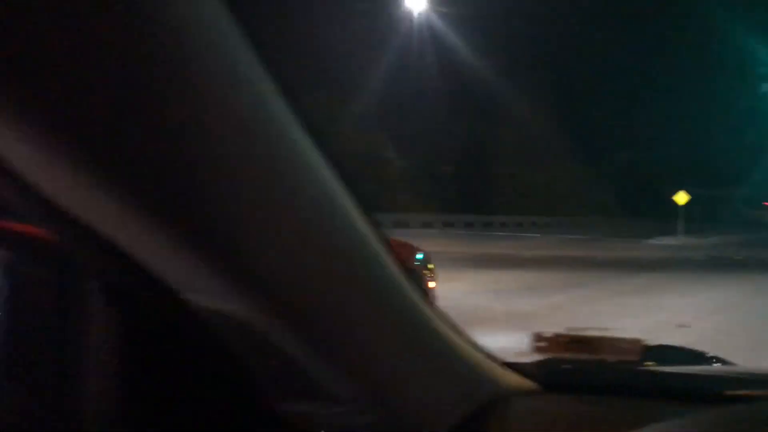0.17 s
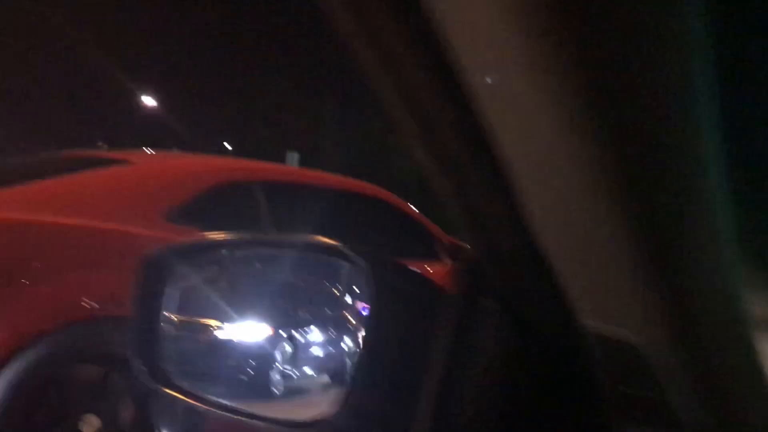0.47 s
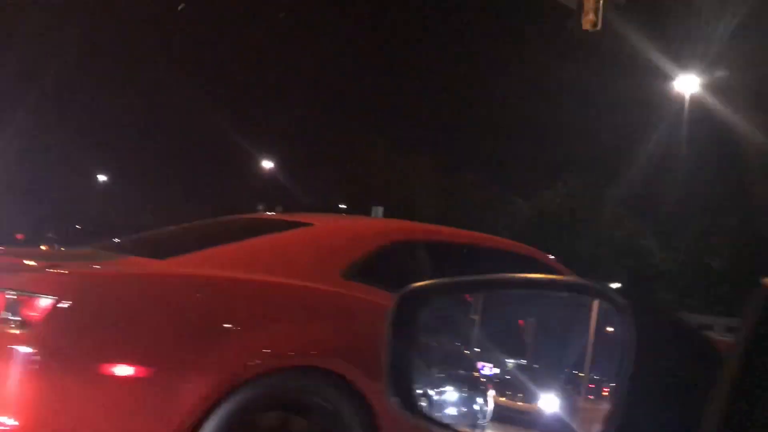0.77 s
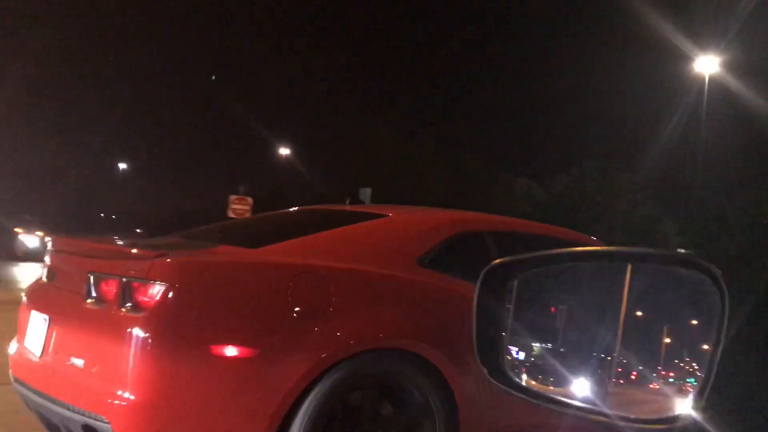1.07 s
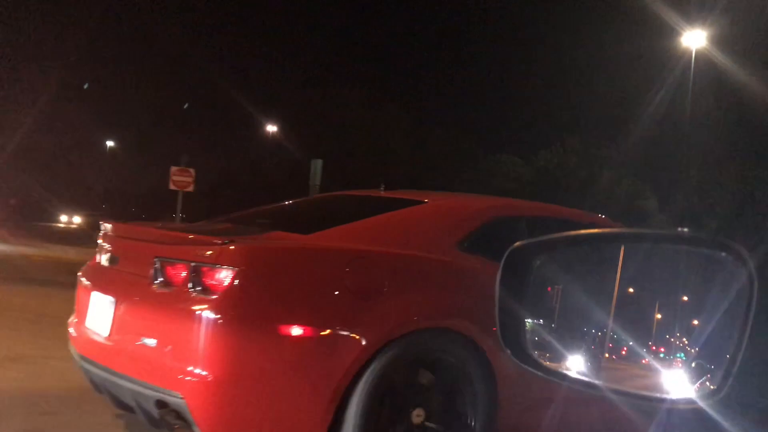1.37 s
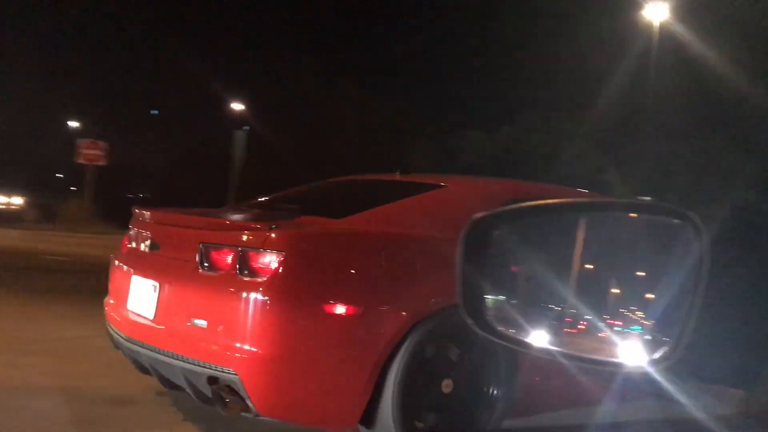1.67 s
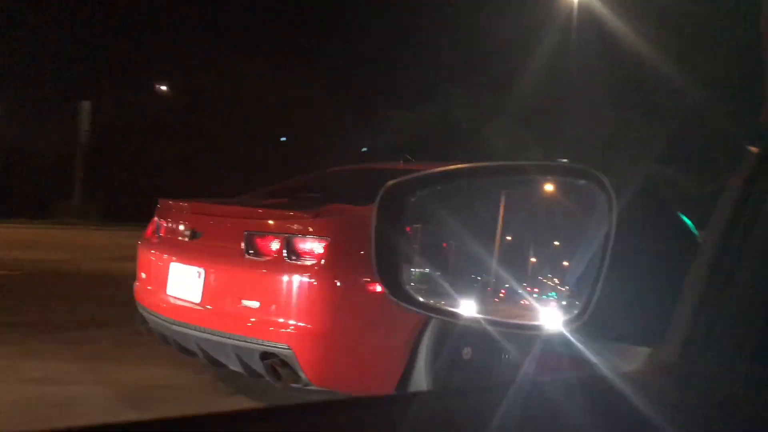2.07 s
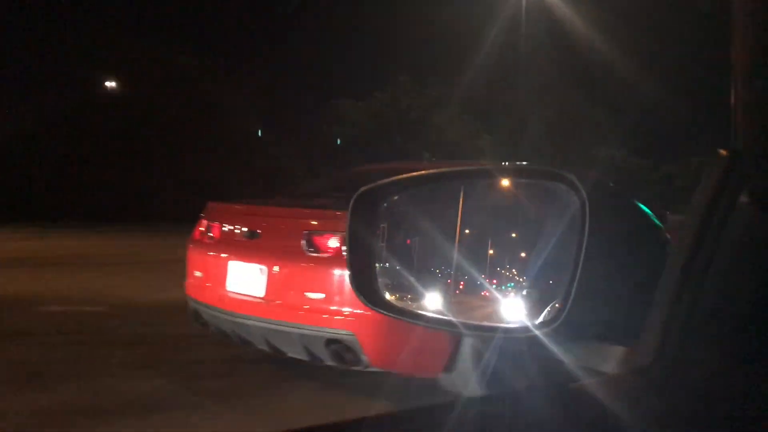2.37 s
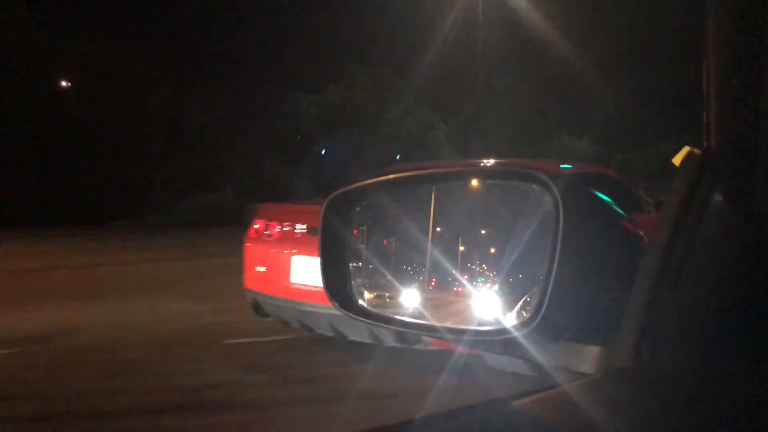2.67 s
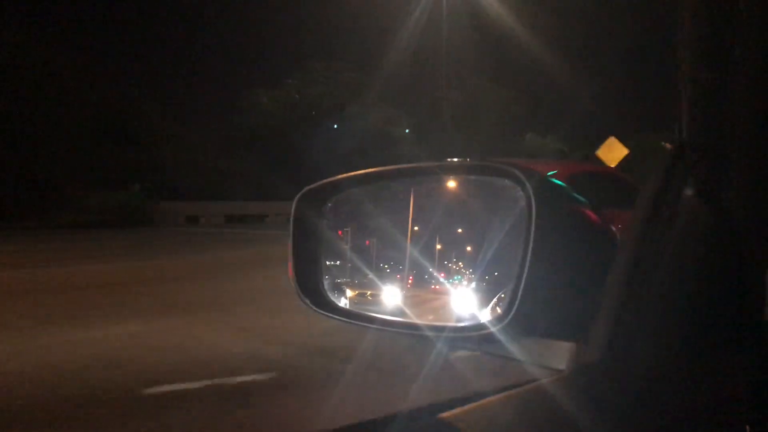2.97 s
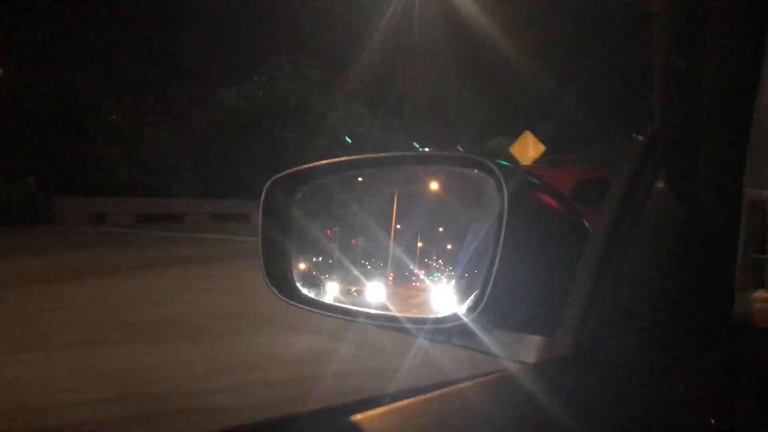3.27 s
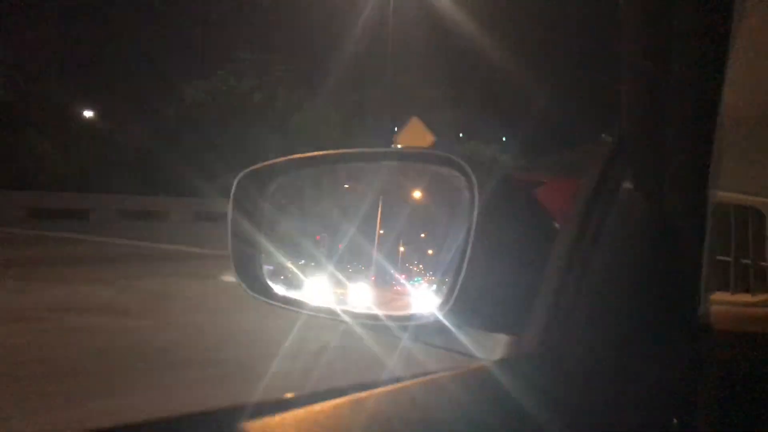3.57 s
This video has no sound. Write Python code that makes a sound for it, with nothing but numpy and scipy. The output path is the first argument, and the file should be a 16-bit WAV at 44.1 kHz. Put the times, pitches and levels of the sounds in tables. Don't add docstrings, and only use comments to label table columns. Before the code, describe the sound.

A deep eight-cylinder car exhaust revs up hard past a car window, then pops and burbles away.

```python
import sys
import numpy as np
from scipy import signal
from scipy.fft import rfft, irfft, next_fast_len
from scipy.io import wavfile
from scipy.ndimage import uniform_filter1d, map_coordinates

SR = 44100
rng = np.random.default_rng(int(sys.argv[2]) if len(sys.argv) > 2 else 0)


def attenuation_scalar(level_db):
    decades = np.asarray(level_db, float) / 20
    return 10 ** decades


def log_audio(samples):
    frames = np.atleast_2d(samples).T
    limited = np.clip(frames, -1, 1)
    pcm = np.round(limited * 32767).astype(np.int16)
    wavfile.write(sys.argv[1], SR, pcm)


N = 164493

# (time [s], view, -2 approaching to 3 far away)
ANGLE = [(0, -2), (.35, -2), (.52, -1), (.68, -1), (.8, 0), (.98, 0), (1.1, 1), (1.75, 1), (1.95, 1.5),
         (2.15, 1.5), (2.35, 2), (2.72, 2), (2.95, 3), (3.73, 3)]
# (resonance [Hz], width [Hz], level [dB])
AWAY = [(347, 26, 0), (459, 108, 0), (564, 71, 3.5), (700, 130, -5), (942, 67, -2), (1090, 200, -16.5),
        (1900, 240, -20.5), (2670, 370, -23.5), (3760, 400, -28.5)]


def unit(x):
    return x / np.sqrt(np.mean(x ** 2) + 1e-20)


def curves(rows):
    s, *cols = np.transpose(rows)
    return [np.interp(np.arange(N) / SR, s, c) for c in cols]


def wobble(rate, order=3):
    knots = rng.standard_normal(int(N * rate / SR) + 4)
    return map_coordinates(knots, [np.arange(N) * rate / SR], order=order)


def filtered(x, response):
    m = next_fast_len(N + SR // 2)
    return irfft(rfft(x, m) * response(np.fft.rfftfreq(m, 1 / SR)), m)[:N]


def resonance(f, centre, width, db):
    return attenuation_scalar(db) * 1j * f * width / (centre * centre - f * f + 1j * f * width)


def resonant(x, peaks):
    return filtered(x, lambda f: sum((-1) ** k * resonance(f, *peak) for k, peak in enumerate(peaks)))


def compact(peaks):
    f = np.fft.rfftfreq(8192, 1 / SR)
    gain = np.sqrt(sum(abs(resonance(f, *peak)) ** 2 for peak in peaks))
    cepstrum = irfft(np.log(gain + 1e-3))
    cepstrum = cepstrum * np.r_[1, 2 * np.ones(4095), 1, np.zeros(4095)]
    return irfft(np.exp(rfft(cepstrum)))[:4096]


def pulses(at, size):
    taps = np.arange(-8, 9)
    i = np.floor(at).astype(int)[:, None] + taps
    d = i - at[:, None]
    w = np.sinc(d) * np.cos(np.pi * d / 18) ** 2 * size[:, None]
    return np.bincount(np.clip(i, 0, N).ravel(), w.ravel(), N + 1)[:N]


def puffs(train, t60):
    shape = attenuation_scalar(-60 * np.arange(SR // 10) / SR / t60)
    return signal.fftconvolve(train, shape)[:N] * rng.standard_normal(N)


def orders(table, turns, depth_db):
    blur = 0.00046 * depth_db ** 2
    total = 0
    for k, db in np.array(table).tolist():
        level = attenuation_scalar(db + depth_db * wobble(7, order=1))
        cycles = round(k) * (turns + blur * wobble(20, order=1)) + rng.random()
        total = total + level * np.sqrt(2) * np.sin(2 * np.pi * cycles)
    return total


def engine():
    # (time [s], engine cycles [Hz], firing beat [dB], its octave [dB])
    revs = [(0, 10.5, -12, -27), (.2, 12.4, -21, -29), (.4, 13.2, -19, -27), (.62, 15.1, -13, -27),
            (.8, 15.8, -18, -21), (.96, 16.7, -11, -16), (1.1, 17.9, -15, -24), (1.3, 18.85, -19, -20),
            (1.6, 20.74, -30, -26), (1.8, 22.05, -25, -30), (2.03, 24, -18, -15), (2.2, 24.8, -25, -14),
            (2.4, 26.7, -34, -22), (2.6, 27.96, -36, -22), (2.8, 28.55, -45, -30), (3, 28.1, -55, -36),
            (3.3, 25.7, -45, -43), (3.73, 21.8, -32, -43)]
    # (time [s], bank limp [dB], crank-turn lope [dB], rasp [dB], misfire depth [dB])
    unevenness = [(0, -40, -29, -27, 2), (.2, -33.5, -26.5, -25, 2), (.45, -27.5, -23, -21, 3),
                  (.64, -25.5, -32.5, -18, 0), (.99, -31, -35.5, -19.5, 4), (1.09, -39, -32.5, -27.5, 2.5),
                  (1.35, -32, -29.5, -23, -0.5), (1.6, -34.5, -25, -22.5, 2.5), (1.85, -27, -25, -20, 2),
                  (2.08, -26, -28.5, -14, 2.5), (2.25, -33, -26, -22.5, 2), (2.45, -29, -33.5, -23, 3.5),
                  (2.68, -24, -40, -22, 4), (2.85, -21.5, -28, -28, -1.5), (3.05, -28, -32.5, -28, 3),
                  (3.3, -30, -33.5, -26.5, 3.5), (3.73, -30, -26.5, -27, 4.5)]
    cylinder_db = [9, 6.5, -3, 6.5, 11.5, 4.5, 6, 0.5]
    hz, beat_db, octave_db = curves(revs)
    limp_db, turn_db, rasp_db, misfire_db = curves(unevenness)
    turns = np.cumsum(hz / SR)
    burble_db = .5 * misfire_db * wobble(23.946)
    note = exhaust_note(turns, beat_db, octave_db, limp_db, turn_db, misfire_db)

    count = np.arange(1, int(8 * turns[-1]))
    chance = rng.standard_normal((len(count), 3))
    jitter = 0.0093
    at = np.interp(count + jitter * chance[:, 0], 8 * turns, np.arange(N))
    i = at.astype(int)
    bark_db = np.take(cylinder_db, count % len(cylinder_db))
    size_db = 0.89 * bark_db + 0.16 * misfire_db[i] * chance[:, 1] + burble_db[i]
    gas = exhaust_gas(pulses(at, attenuation_scalar(size_db) * np.sqrt(22 / hz[i])), rasp_db)
    snaps = firing_snaps(at, bark_db, chance[:, 2], rasp_db)
    return attenuation_scalar(0.75 * burble_db) * note + gas + snaps


def exhaust_note(turns, beat_db, octave_db, limp_db, turn_db, misfire_db):
    beat = [(8, 0.0058)]
    octave = [(16, -1), (24, -24)]
    limp = [(3, -16.5), (5, 2.5), (7, -13.5), (9, -12.5), (11, -2), (13, -5.5), (15, -6), (17, -7.5),
            (19, -3), (21, -13.5), (23, -11.5), (25, -31), (27, -9.5)]
    turn = [(4, -16), (6, -2.5), (10, -3.5), (12, -9), (14, -0.5), (18, -10), (20, -7), (22, -9.5),
            (26, -9.5), (28, -10)]
    # (resonance [Hz], width [Hz], level [dB])
    chambers = [(81, 41, -3.5), (134, 35, 2.5), (184, 54, -3)]
    # (resonance [Hz], width [Hz], level [dB])
    mouth = [(373, 88, 0.0035), (537, 77, 1)]
    # (time [s], level [dB])
    throb = [(1.3, -46), (1.6, -37), (2.2, -50), (2.5, -28.5), (2.8, -26), (2.95, -40), (3.05, -31.5),
             (3.73, -33.5)]
    lope = attenuation_scalar(limp_db) * orders(limp, turns, 1.28 * misfire_db)
    lope = lope + attenuation_scalar(turn_db) * orders(turn, turns, 1.3 * misfire_db)
    far = np.clip(curves(ANGLE)[0] - 2, 0, 1)
    near_lope = lope + resonant(lope, [(193.6, 16.8, 0)])
    far_lope = resonant(resonant(lope, chambers + mouth), chambers + mouth)
    breath_db = .25 * misfire_db
    even = attenuation_scalar(beat_db - 0.3) * orders(beat, turns, breath_db)
    even = even + attenuation_scalar(octave_db + 0.13) * orders(octave, turns, breath_db)
    slow = attenuation_scalar(curves(throb)[0]) * orders([(3, 0)], turns, misfire_db)
    return even + (1 - far) * near_lope + far * far_lope + slow


def exhaust_gas(barks, rasp_db):
    ring_t60, puff_t60, steady_flow = .05, 7.0 * 0.0062, 0.45
    ring_share = np.clip(0.56 + 0.0076 * (rasp_db + 23.5), 0, 1)
    ring = attenuation_scalar(-60 * np.arange(SR // 20) / SR / ring_t60) * rng.standard_normal(SR // 20)
    rattle = unit(signal.fftconvolve(barks - barks.mean(), ring)[:N])
    gas = ring_share * rattle + (1 - ring_share) * unit(puffs(barks, puff_t60))
    gas = gas + steady_flow * rng.standard_normal(N)
    return attenuation_scalar(rasp_db) * angled(unit(gas))


def firing_snaps(at, bark_db, luck, rasp_db):
    hits = pulses(at, attenuation_scalar(1.6 * bark_db + 3 * luck))
    snaps = unit(resonant(puffs(hits, 0.0028), [(3860, 2100, 19), (7000, 830, -17)]))
    return attenuation_scalar(-52 + 1.3 * (rasp_db + 4.0)) * snaps * np.clip(curves(ANGLE)[0], .3, 1)


def angled(x):
    views = [-2, -1, 0, 1, 1.5, 2, 3]
    # (resonance [Hz], width [Hz], level [dB])
    approach = [(366, 55, -7), (560, 93, -1.5), (825, 60, -2), (1070, 114, -1), (1430, 200, -3),
                (1724, 115, -2), (2100, 150, -7), (2580, 180, -17.5), (3100, 510, -18.5)]
    passing = [(370, 34, -3), (560, 41, 2), (670, 140, 0), (865, 60, -2), (1070, 84, 1), (1270, 210, -2.5),
               (1540, 79, 1.5), (2210, 150, -17), (2460, 40, -15), (2820, 100, -26), (3070, 140, -16),
               (3900, 160, -43)]
    alongside = [(404, 25, 2), (527, 67, 1), (650, 80, 3.5), (855, 43, 5.5), (1133, 100, 1),
                 (1580, 110, -5), (1980, 190, -6), (2400, 160, -12), (3040, 130, -17)]
    quarter = [(306, 45, -22), (640, 96, 4.5), (950, 170, -3.5), (1190, 98, -1), (1510, 170, -0.5),
               (1944, 72, 0), (2440, 36, -23), (3100, 250, -21.5), (3220, 170, -12)]
    roar = [(643, 113, 3), (895, 120, -1), (1215, 140, -1.5), (1590, 150, -8.5), (1944, 78, 2),
            (2120, 200, -0.5), (2500, 120, -15), (3480, 200, -14)]
    behind = [(527, 155, 1), (795, 160, 5.5), (974, 190, 4), (1270, 290, -3.5), (2260, 250, -0.5),
              (2800, 160, -5.5), (3180, 220, -13.5), (3940, 320, -23)]
    # (time [s], cancelled band [Hz], depth [dB])
    road_echo = [(0, 2500, -9), (.4, 2250, 15), (.6, 1740, 18), (.76, 1640, 23), (.86, 1530, 0),
                 (1.05, 2420, 4), (1.8, 2600, 10), (2.1, 1820, 2.5), (2.3, 1700, 7), (2.75, 1900, 0),
                 (3.001, 2100, 0.5)]
    crackle_hz, notch_width_hz = 3820, 85
    view, = curves(ANGLE)
    soft = filtered(x, lambda f: 1 / (1 + 1.2j * f / crackle_hz - (f / crackle_hz) ** 2))
    colours = [approach, passing, alongside, quarter, roar, behind, AWAY]
    y = 0
    for row, peaks in zip(np.eye(len(views)), colours):
        share = np.interp(view, views, row) ** 0.82
        y = y + share * unit(signal.fftconvolve(soft, compact(peaks))[:N])
    hz, t, z = signal.stft(y, SR, nperseg=512)
    s, notch_hz, depth_db = np.transpose(road_echo)
    dip = np.exp(-.5 * ((hz[:, None] - np.interp(t, s, notch_hz)) / notch_width_hz) ** 2)
    return signal.istft(z * attenuation_scalar(-np.interp(t, s, depth_db) * dip), SR, nperseg=512)[1][:N]


def pops():
    # (time [s], level [dB], brightness [dB])
    bangs = [(3.022, -20, -3), (3.1, -23.5, -2), (3.175, -11, -6), (3.239, -17.5, 5.5), (3.267, -21, 1),
             (3.357, -13, 0), (3.469, -8.5, -14), (3.513, -15.5, 0), (3.554, -5, -12), (3.6, -6.5, -3.5),
             (3.612, -13, 1), (3.625, -11.5, 4.5), (3.637, -14.5, 5.5), (3.722, -6, -14)]
    # (resonance [Hz], width [Hz], level [dB])
    thump_peak = [(153, 47, 0)]
    s, db, bright_db = np.transpose(bangs)
    at = s * SR
    thump = resonant(resonant(pulses(at, attenuation_scalar(db + 47.5)), thump_peak), thump_peak)
    gas = puffs(pulses(at, attenuation_scalar(db + bright_db + 16.5)), 0.03)
    gas = gas + pulses(at, attenuation_scalar(db + bright_db + 33))
    run_start_s, run_hz, run_t60, run_db = 3.602, 177, .4, 23.5
    t = np.arange(20) / run_hz
    run_level = attenuation_scalar(run_db - 60 * t / run_t60 + 2 * rng.standard_normal(len(t)))
    run = pulses((run_start_s + t) * SR, run_level)
    dulled = filtered(gas + run, lambda f: 1 / (1 + 1j * f / 5000) ** 2)
    return thump + resonant(dulled, AWAY) + resonant(run, [(181, 17, 4.6)])


def cracks():
    # (time [s], peak level [dB])
    hard_firings = [(1.9026, -36), (1.962, -23), (2.0278, -20.5), (2.0474, -29), (2.0872, -20),
                    (2.112, -21), (2.1274, -24), (2.147, -23), (2.169, -24), (2.1903, -36), (2.2295, -33),
                    (2.3067, -28), (2.3835, -27), (2.459, -27), (2.4947, -24.5), (2.5671, -29),
                    (2.6524, -30), (3.6259, -24.5)]
    s, db = np.transpose(hard_firings)
    hits = pulses(s * SR, attenuation_scalar(db - 1)) + pulses((s + 0.0033) * SR, attenuation_scalar(db))
    snap = resonant(puffs(hits, 0.011), [(3560, 2300, 9), (6800, 4600, -7.5)])
    return resonant(snap, [(3960, 4600, 0)])


def street(x):
    echo_db, echo_t60 = -12.5, 0.085
    tail = rng.standard_normal(SR // 2) * attenuation_scalar(-60 * np.arange(SR // 2) / SR / echo_t60)
    return x + attenuation_scalar(echo_db) * signal.fftconvolve(x, tail / np.linalg.norm(tail))[:N]


def rush(spectrum, patchy_db):
    z = signal.stft(rng.standard_normal(N), nperseg=512)[2]
    field = uniform_filter1d(uniform_filter1d(rng.standard_normal(z.shape), 6, 0), 10, 1)
    x = signal.istft(z * attenuation_scalar(patchy_db * unit(field)), nperseg=512)[1][:N]
    f, v = np.transpose(spectrum)
    return unit(filtered(x, lambda hz: attenuation_scalar(np.interp(np.log(hz + 1), np.log(f + 1), v))))


def road_and_wind():
    # (time [s], level [dB])
    road = [(0, -22), (.25, -19), (.5, -25), (.8, -25), (1.05, -36), (1.5, -27.5), (2.2, -30), (2.8, -33),
            (3.3, -22.5), (3.73, -19.5)]
    # (time [s], level [dB])
    wind = [(0, -45.5), (.3, -43.5), (.55, -37.5), (.88, -40), (1.07, -49), (1.8, -48), (2.1, -56),
            (2.65, -49.5), (2.95, -54.5), (3.73, -72)]
    # (frequency [Hz], density [dB per Hz])
    rumble_colour = [(20, -15), (45, -3.5), (80, -0.5), (140, 5.5), (200, -2), (260, -18), (420, -22),
                     (1500, -57)]
    hiss_colour = [(2350, -16), (4000, -2.5), (5020, -15.5), (8450, -0.5), (10500, -5.5), (14800, -3),
                   (16000, -1.5)]
    road_db, = curves(road)
    hiss_db, = curves(wind)
    rumble = attenuation_scalar(road_db + 1.2 * wobble(14)) * rush(rumble_colour, patchy_db=1.5)
    hiss = attenuation_scalar(hiss_db + 1.6 + 0.39 * wobble(17)) * rush(hiss_colour, patchy_db=1)
    return rumble + hiss


def scene():
    return (street(engine() + pops() + cracks()) + road_and_wind())[None]


def roll_off(x):
    return signal.sosfilt(signal.butter(12, 16160, fs=SR, output="sos"), x)


def record(dry):
    bass_hz, top_hz, clip_level = 38, 15750, 1.1
    x = filtered(dry[0], lambda f: (1j * f / (bass_hz + 1j * f)) ** 2 * (f < top_hz))[None]
    x = x / (1 + np.abs(x / clip_level) ** 6) ** (1 / 6)
    return roll_off(x)


dry = scene()
out = record(dry)
log_audio(out)
```